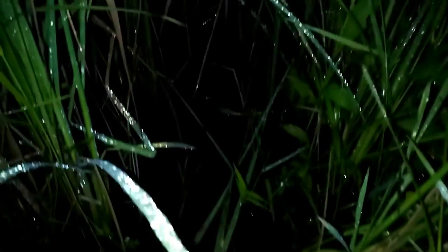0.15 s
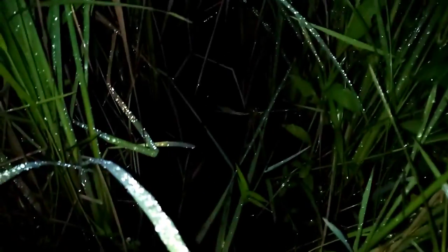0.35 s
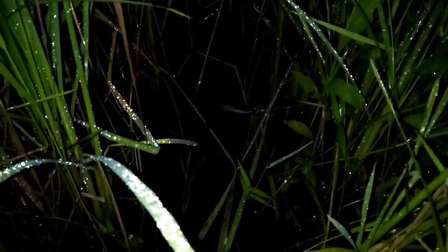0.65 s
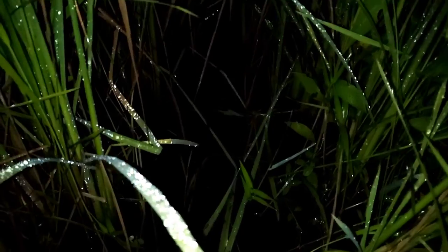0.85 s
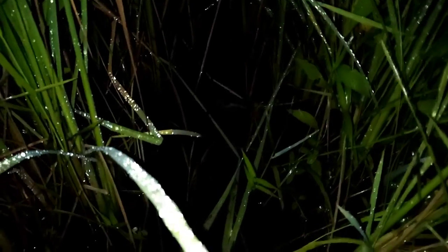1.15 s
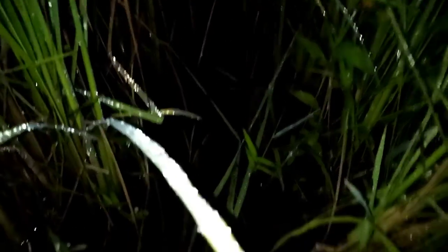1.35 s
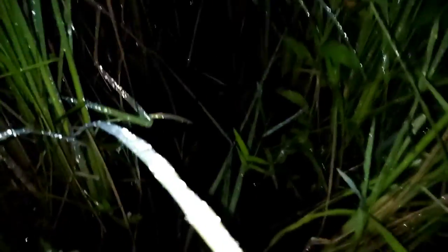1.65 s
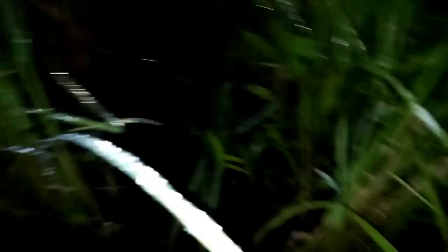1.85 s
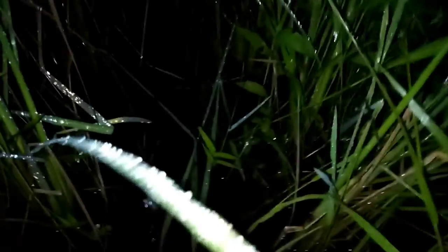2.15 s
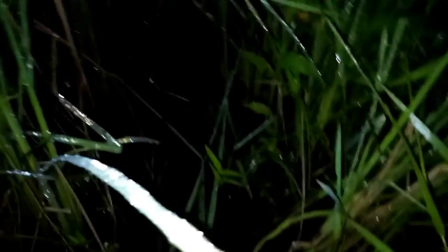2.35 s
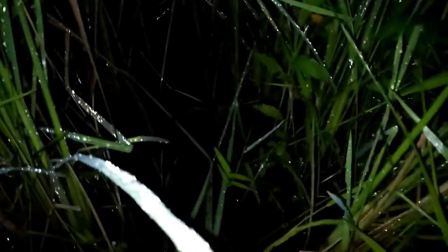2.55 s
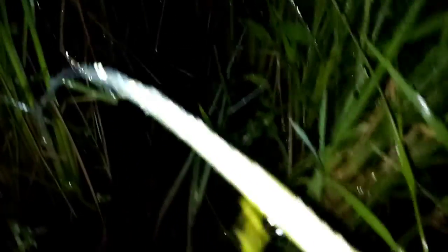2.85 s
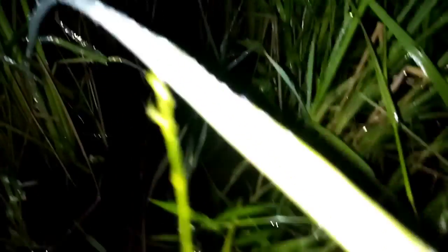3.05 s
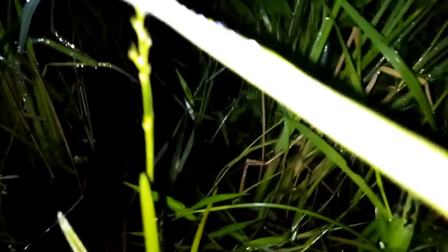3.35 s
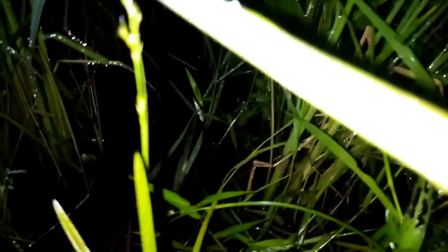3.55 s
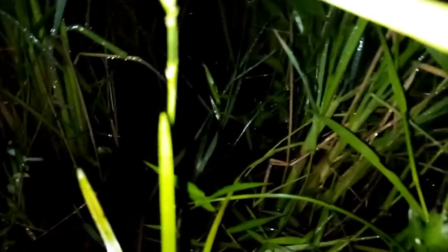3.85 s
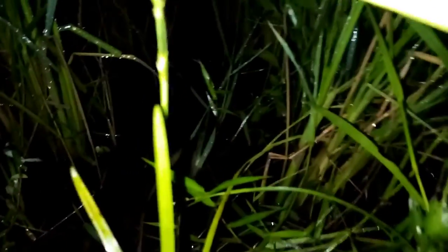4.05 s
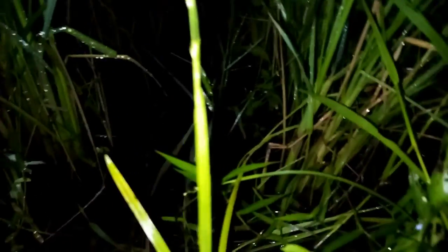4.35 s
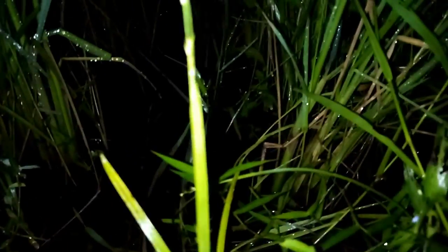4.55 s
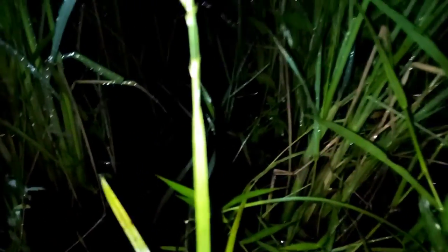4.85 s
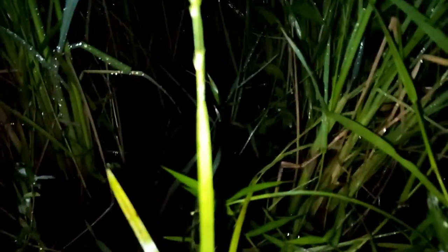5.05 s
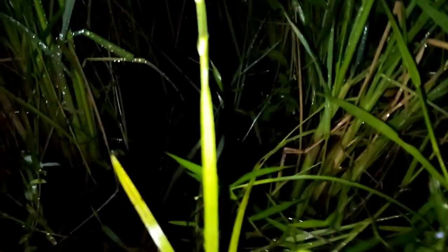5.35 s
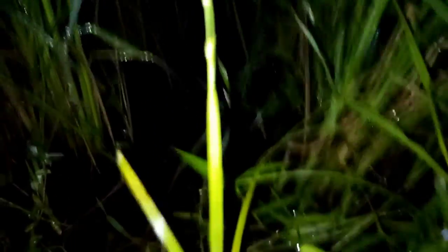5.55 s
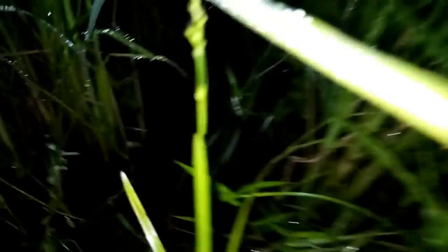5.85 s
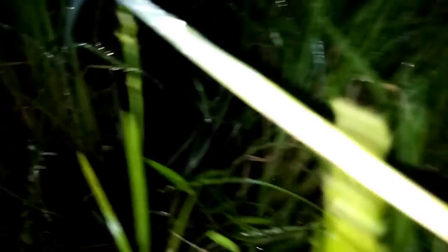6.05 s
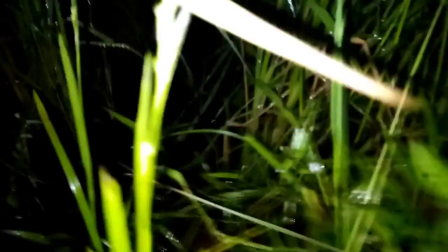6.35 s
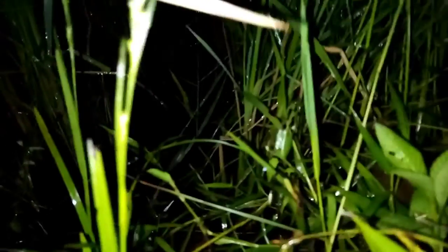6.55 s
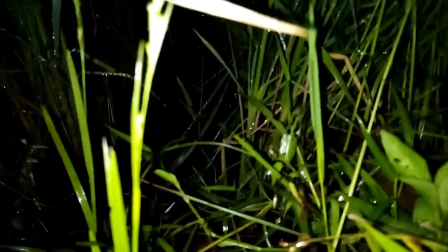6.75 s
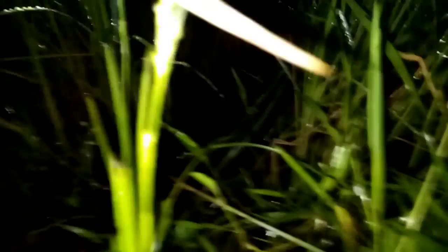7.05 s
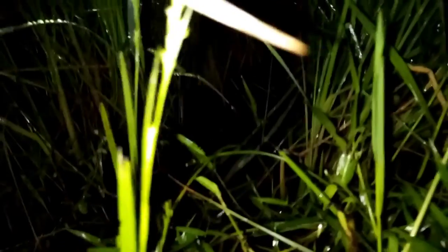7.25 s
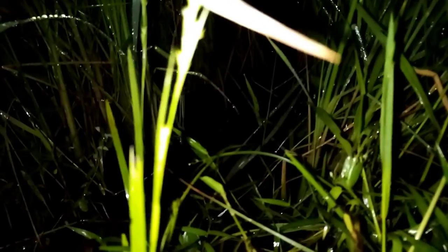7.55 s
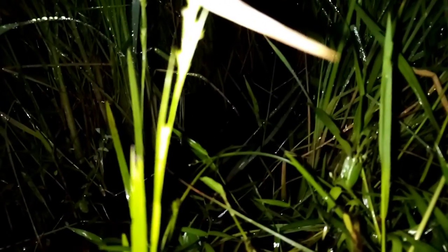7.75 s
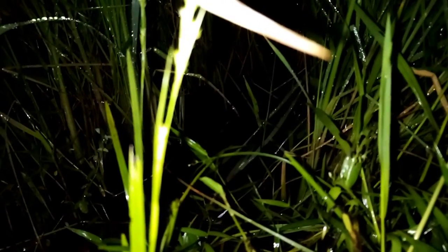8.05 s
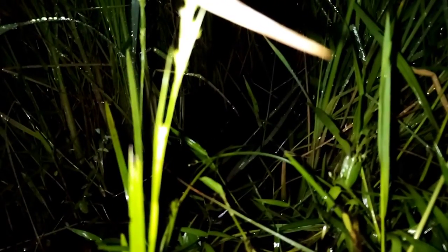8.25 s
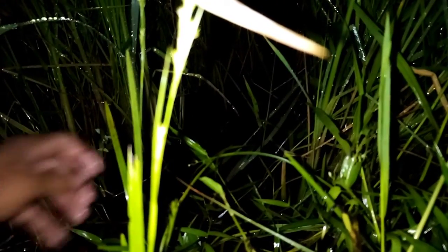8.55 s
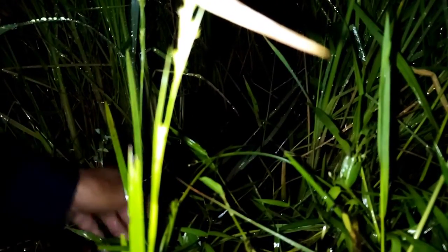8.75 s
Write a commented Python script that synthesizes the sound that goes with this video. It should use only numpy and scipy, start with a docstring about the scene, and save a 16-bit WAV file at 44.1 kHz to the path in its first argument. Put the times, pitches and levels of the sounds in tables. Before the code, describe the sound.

Crickets chirp steadily at night over distant frogs, with faint grass rustling, a brief splash, a few microphone knocks and nearer buzzing frog calls.

```python
"""Wet grass at the water's edge, at night. Close to the microphones a cricket scrapes its wings in nine
chirps a second; far off lies a chorus of crickets and frogs. A nearer frog gives three buzzing calls,
pulses ringing in its vocal sac. Blades rustle, drops tick on leaves, water splashes briefly, a hand
reaches into the grass and the hand-held camera is knocked. The right microphone is muffled,
so sound through the air is heard almost wholly on the left."""
import sys
import numpy as np
from scipy import signal
from scipy.fft import next_fast_len
from scipy.io import wavfile
from scipy.ndimage import map_coordinates

SR = 44100
rng = np.random.default_rng(int(sys.argv[2]) if len(sys.argv) > 2 else 0)


def master_out(mix):
    """Clip the mix to full scale and print it as 16-bit PCM to the path in sys.argv[1]."""
    frames = np.transpose(np.atleast_2d(mix))
    ceiling = np.clip(frames, -1, 1)
    pcm = np.round(ceiling * 32767).astype(np.int16)
    wavfile.write(sys.argv[1], SR, pcm)


N = 392049
TIME = np.arange(N) / SR


def near_cricket(wing_hz=6985, strokes_per_s=107, chirp_s=.066, sink_hz=190, gain_db=1):
    """Close by: each chirp is a swell of wing strokes; the tone sinks and scrapes through each stroke."""
    # chirps: (middle [s], level [dB])
    chirps = [(0.089, -43), (0.204, -47), (0.326, -41.5), (0.424, -42), (0.537, -43.5), (0.647, -41),
              (0.756, -40.5), (0.861, -38.5), (0.979, -38), (1.092, -37), (1.208, -40), (1.31, -38),
              (1.409, -40.5), (1.545, -38.5), (1.647, -35.5), (1.762, -36), (1.874, -37.5), (1.976, -36),
              (2.087, -37.5), (2.203, -36.5), (2.314, -38), (2.425, -36), (2.536, -35), (2.644, -34.5),
              (2.754, -35.5), (2.867, -38.5), (2.988, -40.5), (3.104, -37.5), (3.21, -37), (3.328, -39.5),
              (3.438, -40.5), (3.543, -40), (3.679, -41), (3.793, -41.5), (3.883, -42.5), (3.988, -40),
              (4.09, -40.5), (4.213, -44), (4.315, -42.5), (4.424, -41.5), (4.549, -40.5), (4.646, -43.5),
              (4.762, -41.3), (4.878, -46), (4.984, -43.5), (5.099, -42.5), (5.216, -43.5), (5.343, -41.5),
              (5.445, -42), (5.578, -41.5), (5.7, -41.5), (5.784, -39.5), (5.893, -43.5), (6.004, -41.5),
              (6.118, -37), (6.232, -46), (6.343, -40.5), (6.462, -42), (6.574, -42.5), (6.674, -41),
              (6.792, -40.5), (6.903, -37.5), (7.02, -39.5), (7.135, -37), (7.249, -39.5), (7.354, -39),
              (7.466, -36.5), (7.591, -39), (7.698, -40), (7.818, -41), (7.927, -40.5), (8.034, -41),
              (8.148, -40.5), (8.255, -41), (8.38, -40), (8.478, -40), (8.6, -40.5), (8.715, -39.5),
              (8.835, -46.5)]
    out, t = np.zeros(N), np.arange(int(chirp_s * SR)) / SR
    swell = signal.windows.tukey(len(t), .28)
    for at, db in chirps:
        pace = strokes_per_s * (1 + .04 * rng.standard_normal())
        strokes = t * pace + rng.random() + .04 * drift(len(t), 100)
        within = strokes % 1
        force = np.sin(np.pi * within) ** 1.4 * amp(1.6 * rng.standard_normal(32)[strokes.astype(int)])
        hz = wing_hz + sink_hz * (.5 - within) + 40 * drift(len(t), 150)
        scrape = .22 * drift(len(t), 450)
        tone = np.sin(phase(hz) + scrape)
        add(out, at - chirp_s / 2, amp(db + gain_db) * evened(force * tone * swell))
    # as the camera sways, the echoes from the stalks blend from one pattern into another
    sway = 2 * np.pi * .27 * TIME
    blends = abs(np.cos(sway)), abs(np.sin(sway))
    heard = sum(scattered(out * blend, t60=.055, wet_db=-8) * blend for blend in blends)
    return out.std() * evened(heard)


def near_frog(bank_echo_s=.21):
    """Nearer than the chorus: two bright calls and a deeper one, each thrown back by the far bank."""
    # bright calls: (start [s], length [s], level [dB], pulse rate [Hz], scoop [share], scoop time [s],
    # droop [share], roughness [ratio], lift of the sac's lower ring [dB], bank echo [dB])
    bright_calls = [(-.055, .455, -41.5, 148.8, .06, .155, .012, .42, 7, -14),
                    (6.345, .41, -40, 147.8, .05, .11, .03, .26, 0, -17)]
    # the deeper call, same columns
    deep_calls = [(6.845, .47, -44, 126.8, -.03, .19, .003, .22, 0, -26)]
    # resonances of the vocal sac in each kind of call: (frequency [Hz], level [dB])
    bright_sac = [(1700, -45), (2200, -19), (2350, -11), (2500, -12), (2660, -10), (2810, -13), (2950, -5),
                  (3090, 1), (3250, -1), (3400, -17), (4100, -40), (5000, -17), (5200, -20), (5470, -16),
                  (5900, -26), (9000, -75)]
    deep_sac = [(1700, -42), (1920, -27), (2030, -11), (2160, 0), (2290, -8), (2410, -13), (2550, -14),
                (2670, -20), (2900, -40), (3900, -40), (4060, -20), (4190, -14), (4450, -24), (4800, -45),
                (9000, -96)]
    out = np.zeros(N)
    for calls, sac in (bright_calls, bright_sac), (deep_calls, deep_sac):
        for start, *shape, echo_db in calls:
            call = frog_call(*shape, sac)
            add(out, start, call)
            add(out, start + bank_echo_s, amp(echo_db) * call)
    return scattered(scattered(out, t60=.039, wet_db=-13), t60=.45, wet_db=-8)


def frog_call(length, db, pulse_hz, scoop, scoop_s, droop, rough, lift_db, sac):
    """Uneven pulses buzz through the vocal sac; they glide onto their rate and sag as the air runs out."""
    rise_s, release_s, ring_hz, ring_width_hz = .096, .011, 2480, 190
    t = np.arange(0, length, 1 / SR)
    hz = pulse_hz * (1 - scoop * np.exp(-(t / scoop_s) ** 4) - droop * (t / length) ** 6)
    hoarse = rough * (1 + 6.6 * (2 * t / length - 1) ** 2)  # roughest at both ends
    turns = np.cumsum(hz * (1 + .0033 * drift(len(t), 127.6))) / SR
    # the way through the reeds smears the pulses and lets each overtone swell on its own
    overtones = (amp(1.8 * drift(len(t), 14)) * np.cos(2 * np.pi * k * turns + .8 * drift(len(t), 7))
                 for k in range(10, 48))
    pulses = evened(sum(overtones))
    puffs = evened(np.exp(-(turns % 1) / 3.2) * rng.standard_normal(len(t)))
    throat = [(f, level + lift_db * np.exp(-((f - ring_hz) / ring_width_hz) ** 2)) for f, level in sac]
    drive = (pulses + hoarse * puffs) / np.sqrt(1 + (hoarse / 2) ** 2)
    buzz = evened(coloured(drive * amp(1.1 * drift(len(t), 90)), throat))
    return amp(db) * buzz * np.minimum(t / rise_s, 1) * np.minimum((length - t) / release_s, 1)


def camera_knocks(rattle_s=.0033, right_db=-1, right_lag_s=.00081):
    """At the microphones: a rattling click through the air, and a thud of the casing that reaches both."""
    # knocks: (time [s], thud level [dB], click level [dB], thud's low cut [Hz])
    knocks = [(.835, -50, -60, 100), (1.336, -37, -61, 200), (4.358, -28, -23, 390),
              (4.43, -36, -28.5, 280), (5.5575, -19, -19, 111), (5.58, -29.5, -35, 149),
              (6.263, -33.5, -35, 170), (6.279, -50, -46, 170)]
    # modes of the casing: (frequency [Hz], level [dB], time to fall 60 dB [s])
    modes = [(212, -7.5, 0.11), (327, -7, 0.04), (433, -3, 0.05), (468, 2.5, 0.095)]
    # spectrum of the click: (frequency [Hz], level [dB])
    click_colour = [(40, -43), (200, -4.5), (500, 5), (800, -27), (1400, -6), (1750, -0.5), (2300, -17.5),
                    (3200, -18.5), (4300, -17.5), (6000, -23.5), (9000, -39.5), (15000, -74.5)]
    thud, click, t = np.zeros(N), np.zeros(N), np.arange(SR // 6) / SR
    ring = sum(amp(db - 60 * t / t60) * np.sin(2 * np.pi * hz * t) for hz, db, t60 in modes) / 3
    for at, thud_db, click_db, low_hz in knocks:
        burst = coloured(rng.standard_normal(len(t)) * np.exp(-t / rattle_s), click_colour)
        low_cut = signal.butter(3, low_hz, "high", fs=SR, output="sos")
        add(thud, at, amp(thud_db) * signal.sosfilt(low_cut, ring))
        add(click, at, amp(click_db) * burst / abs(burst).max())
    right_thud = amp(right_db) * np.roll(thud, round(right_lag_s * SR))
    return scattered(click, t60=.14, wet_db=-7.5), np.array([thud, right_thud])


def water(splash_db=7, rise_s=.014, fall_s=.015, plop_db=2, bubbles=14, bubble_t60=.018):
    """Quick sloshes of spray, and clusters of small bubbles that rise in pitch as they ring."""
    # sloshes: (peak time [s], level [dB])
    sloshes = [(3.95, -60), (4.048, -53), (4.14, -50), (4.164, -39), (4.228, -48), (4.285, -49),
               (4.335, -46.5), (4.435, -56), (4.515, -61)]
    # stirred water swelling beneath them: (middle [s], level [dB], length [s])
    surge = [(4.19, -62.5, 0.76)]
    # spray with the hollow ring of the water: (frequency [Hz], level [dB])
    splash_colour = [(50, -80), (300, -42.5), (650, -31), (980, 9), (1230, -13), (1480, -2), (1650, 3.5),
                     (1820, 1.5), (2300, -9.5), (3200, -12.5), (4500, -22.5), (8000, -60)]
    # plops: (start [s], level [dB], bubble pitch [Hz], length [s])
    plops = [(4.141, -31, 1580, 0.028), (4.159, -33, 1440, 0.0075), (4.162, -26, 1044, 0.015),
             (4.223, -36.5, 1004, .015), (5.724, -49, 1560, 0.0075), (6.229, -37, 1090, 0.0087),
             (6.242, -42, 1410, .025), (6.444, -45.5, 1660, .015), (6.857, -42, 1770, 0.07),
             (6.927, -42, 1800, 0.071), (7.023, -43.5, 1800, 0.072)]
    slosh = sum(amp(db) * np.exp(-np.maximum((at - TIME) / rise_s, (TIME - at) / fall_s).clip(0, 20))
                for at, db in sloshes)
    spray = evened(coloured(grains(N, per_s=2500, spread_db=2), splash_colour))
    out = (slosh + swells(surge)) * amp(splash_db + 2 * drift(N, 60)) * spray
    t = np.arange(SR // 25) / SR
    decay = amp(-60 * t / bubble_t60)
    for at, db, hz, length in plops:
        soft_start = 1 - np.exp(-t * hz)  # a bubble takes about a cycle to get going
        for k, (detune, force) in enumerate(rng.standard_normal((bubbles, 2))):
            bubble = np.sin(2 * np.pi * hz * np.exp(.029 * detune) * t * (1 + t)) * decay * soft_start
            start = at + length * (k + rng.random()) / bubbles
            add(out, start, amp(db + plop_db + 2 * force) * bubble)
    return scattered(out, t60=.063, wet_db=-3.5)


def grass(stalks_db=10, brush_db=3):
    """Stalks crackle softly throughout; now and then a wet blade brushes past, catching and slipping."""
    # stalks stirring and blades brushing: (middle [s], level [dB], length [s])
    stirs = [(.3, -78, 0.23), (1.3, -78.5, 0.66), (1.76, -70, 0.22), (2.2, -74.5, 0.52), (3.0, -78, .7),
             (4.25, -61, 0.39), (5.7, -75, 0.21), (6.9, -74, 0.19), (8.58, -67.5, 0.39)]
    brushes = [(.01, -42, 0.04), (.12, -51.5, 0.17), (0.803, -52.5, 0.057), (0.921, -52, 0.019),
               (1.21, -52.5, 0.11), (1.287, -52, 0.041), (1.685, -52, 0.057), (1.775, -51, 0.17),
               (2.067, -50.5, 0.16), (2.265, -51, 0.068), (2.745, -52.5, 0.033), (3.76, -46.5, 0.052),
               (4.036, -46.5, 0.013), (6.254, -47, 0.053), (6.912, -48.5, 0.3), (7.147, -53.5, 0.12),
               (8.365, -51, 0.21), (8.649, -54, 0.4)]
    # their spectra: (frequency [Hz], level [dB])
    stalk_colour = [(150, -10), (400, 18.5), (850, 24), (1500, 28), (2800, 12.5), (4000, -7), (5000, 13),
                    (7500, 24), (9000, -53), (12000, -90.5)]
    blade_colour = [(500, -19.5), (1500, -5.5), (3000, 0), (4800, -1.5), (7000, 10.5), (8200, -4),
                    (9300, -17), (12000, -57), (15500, -26.5)]
    stirring = amp(stalks_db) * (amp(-81) + swells(stirs))
    stalks = stirring * evened(coloured(grains(N, per_s=2000, spread_db=3), stalk_colour))
    catching = amp(3 * drift(N, 140))
    blades = swells(brushes) * evened(catching * coloured(grains(N, per_s=3000, spread_db=3), blade_colour))
    return scattered(stalks + amp(brush_db) * blades, t60=.029, wet_db=5.5)


def snapping_blades(attack_s=.004):
    """A crisp crackle starts sharply and dies away as a blade lets go."""
    # snaps: (time [s], level [dB], decay [s])
    snaps = [(.805, -52, 0.011), (0.92, -51, 0.0084), (1.282, -50, 0.0071), (1.665, -43, 0.018),
             (1.731, -53, 0.015), (1.799, -44, 0.014), (1.819, -44.5, 0.0085), (3.747, -50, 0.011),
             (8.362, -62, 0.0047), (8.634, -69, 0.0053)]
    # their spectrum: (frequency [Hz], level [dB])
    snap_colour = [(300, -27), (2500, -6), (4500, -5), (8000, -9), (12500, -21.5), (15000, -19)]
    out, t = np.zeros(N), np.arange(SR // 8) / SR
    for at, db, decay_s in snaps:
        crackle = evened(coloured(grains(len(t), per_s=6000, spread_db=1), snap_colour))
        add(out, at, amp(db) * crackle * np.minimum(t / attack_s, 1) * np.exp(-t / decay_s))
    return out


def reaching_hand(catch_db=2):
    """A hand and sleeve push into the grass: soft buffets of cloth under a clumpy crackle of stalks."""
    # reaches: (middle [s], level [dB], length [s])
    reaches = [(8.34, -52, 0.033), (8.62, -52, 0.24)]
    # spectrum of cloth and stalks: (frequency [Hz], level [dB])
    hand_colour = [(40, -14), (120, 11), (300, 14.5), (550, -18), (950, 12.5), (1800, 0), (5500, 9.5),
                   (9000, -28), (12000, -45)]
    crackle = coloured(grains(N, per_s=1400, spread_db=3), hand_colour)
    return swells(reaches) * evened(crackle * amp(catch_db * drift(N, 41)))


def drips(t60=.028, half_width_hz=1100):
    """Each drop gives a leaf a short, noisy, high ring."""
    # drops landing: (time [s], level [dB], pitch [Hz])
    drops = [(3.747, -36, 5630), (4.7655, -32, 5230), (5.46, -48, 4550), (5.618, -38, 3380),
             (8.219, -32, 4240), (8.22, -37, 2125)]
    out, t = np.zeros(N), np.arange(SR // 20) / SR
    onset = 1 - np.exp(-t * half_width_hz)
    for at, db, hz in drops:
        tick = drift(len(t), 2 * half_width_hz) * np.sin(2 * np.pi * hz * t)
        add(out, at, amp(db - 60 * t / t60) * onset * tick)
    return out


def trilling_cricket(wing_hz=6480, strokes_per_s=90, wander_hz=130):
    """Now and then a lower-pitched cricket rises out of the chorus with one short trill of its wings."""
    # trills: (middle [s], level [dB], length [s])
    trills = [(4.22, -47, 0.11), (4.72, -43.5, 0.15), (6.02, -39.5, 0.048), (6.88, -46, 0.1),
              (7.76, -44.5, 0.25)]
    tone = np.sin(phase(wing_hz + wander_hz * drift(N, 300)))
    strokes = 1 + np.sin(2 * np.pi * strokes_per_s * TIME + drift(N, 14))
    return swells(trills) * evened(scattered(strokes * tone, t60=.085, wet_db=-8.5))


def far_crickets(count=16, level_db=-42, waver_db=2):
    """Many crickets, each on its own pitch and rhythm, blurred by distance."""
    # spectrum of the chorus: (frequency [Hz], level [dB])
    chorus_colour = [(5000, -54.5), (5800, -17), (6150, -2.5), (6450, -3), (6750, 4), (7000, 4),
                     (7400, -9.5), (8050, -23.5), (9100, -59.5), (12000, -74.5)]
    out = np.zeros(N)
    for hz in np.linspace(6120, 6820, count):
        chirps_per_s, strokes_per_s, offset = rng.uniform(5, 11), rng.uniform(65, 125), rng.random()
        chirping = 1 + np.sin(2 * np.pi * (chirps_per_s * TIME + offset + .24 * drift(N, 2)))
        strokes = 2 * np.pi * strokes_per_s * TIME + drift(N, 23)
        tone = np.sin(phase(hz + 35 * drift(N, 60)) + np.cos(strokes))
        out += chirping * (1 + np.sin(strokes)) * tone
    blur = evened(scattered(out, t60=.64, wet_db=-3.5))
    blur += amp(10) * rng.standard_normal(N)  # the farthest merge into a hiss
    return amp(level_db + waver_db * drift(N, 2.7)) * evened(coloured(blur, chorus_colour))


def far_frogs(edge_s=.16, low_db=-1.5, high_db=1.5):
    """Far across the water: low-voiced frogs call in bouts, high-voiced ones without a pause."""
    # bouts of the low voices: (start [s], end [s], level [dB])
    bouts = [(-.3, 3.5, -60.5), (3.7, 5.75, -70.5), (5.74, 6.1, -58.5), (6.25, 7.75, -62.5),
             (8.2, 8.9, -59.5)]
    # the high voices wander together: (time [s], pitch [Hz])
    high_pitch = [(.6, 3463), (1.05, 3380), (1.5, 3438), (3.2, 3404), (3.8, 3446), (4.55, 3297),
                  (5.4, 3470), (6.3, 3360), (7.4, 3500), (8.1, 3301), (8.8, 3450)]
    # and ease off now and then: (time [s], level [dB])
    high_level = [(0, -62), (.6, -64), (.78, -58.5), (2.9, -59.5), (3.3, -57.5), (4.05, -57.5), (4.55, -65),
                  (4.85, -58.5), (5.1, -60), (5.55, -55), (5.85, -60), (6.9, -59), (7.2, -61), (7.7, -56.5),
                  (8.15, -60), (8.8, -56)]
    calling = sum(amp(db) * np.clip(np.minimum(TIME - start, end - TIME) / edge_s + .5, 0, 1)
                  for start, end, db in bouts)
    low = frog_choir(sac_hz=2168, width_hz=170, pulse_hz=60)
    low = amp(low_db) * evened(patchy(low, depth_db=3, patch_hz=90, patch_s=.1))
    hz = curve(high_pitch)
    high = frog_choir(sac_hz=hz.mean(), width_hz=350, pulse_hz=105)
    high = patchy(high, depth_db=2.5, patch_hz=120, patch_s=.05)
    wandering = (signal.hilbert(high, next_fast_len(N))[:N] * np.exp(1j * phase(hz - hz.mean()))).real
    return (amp(-73) + calling) * low + amp(high_db + curve(high_level)) * evened(wandering)


def frog_choir(sac_hz, width_hz, pulse_hz, count=4):
    """A few distant frogs: overlapping pulse trains ringing in their vocal sacs."""
    pulses = np.zeros(N)
    for _ in range(count):
        turns = np.cumsum(pulse_hz * (rng.uniform(.75, 1.25) + .07 * drift(N, 25))) / SR
        pulses += np.diff(np.floor(turns), prepend=0) * amp(2.5 * drift(N, 60))
    sac = signal.butter(3, [sac_hz - width_hz / 2, sac_hz + width_hz / 2], "band", fs=SR, output="sos")
    return evened(scattered(signal.sosfilt(sac, pulses), t60=.47, wet_db=-2.5))


def far_insects(band_hz=(4575, 5325), gain_db=-1):
    """Distant insects merge into one thin, finely grained band beneath the crickets."""
    # their rise and fall: (time [s], level [dB])
    level = [(0, -61.5), (1.4, -60), (3.1, -60.5), (3.6, -64), (5.3, -66.5), (6.1, -63.5), (6.4, -57.5),
             (7.2, -64.5), (7.9, -60.5), (8.8, -59.5)]
    band = signal.butter(2, band_hz, "band", fs=SR, output="sos")
    shrill = signal.sosfilt(band, grains(N, per_s=1500, spread_db=1))
    return amp(gain_db + curve(level)) * evened(patchy(shrill, depth_db=2.5, patch_hz=150, patch_s=.06))


def far_wash(half_width_hz=330, gain_db=1.5):
    """From far off, a soft band of noise comes and goes in patches."""
    # course of the wash: (time [s], level [dB], centre [Hz])
    course = [(0, -65.5, 564.2), (2.1, -61.5, 512.6), (2.6, -68, 602.3), (3.3, -66, 699.3), (4.9, -70, 863),
              (6.198, -59.5, 854.5), (7.2, -58.5, 854.5), (7.9, -71.5, 799), (8.6, -59.5, 655)]
    # its colour: (frequency [Hz], level [dB])
    wash_colour = [(250, -5.5), (470, 0.5), (600, -9), (740, 4), (1000, -1), (1400, -13)]
    times, db, hz = np.transpose(course)
    lowpass = signal.butter(3, half_width_hz, fs=SR, output="sos")
    band = signal.sosfilt(lowpass, rng.standard_normal(N) + 1j * rng.standard_normal(N))
    noise = (band * np.exp(1j * phase(np.interp(TIME, times, hz)))).real
    wash = patchy(coloured(noise, wash_colour), depth_db=9.5, patch_hz=95, patch_s=.075)
    return amp(np.interp(TIME, times, db) + gain_db) * evened(wash)


def night_air(shared=.36, rumble_top_hz=300, swell_db=7):
    """A lumpy far rumble, partly common to both microphones, under a faint shifting hiss."""
    # still air at each microphone: (frequency [Hz], level [dB])
    left_colour = [(20, -105), (45, -95.5), (75, -82.5), (120, -77.5), (175, -80.5), (250, -93), (500, -95),
                   (1400, -101), (4000, -101), (5700, -101), (8000, -113), (9000, -123), (13000, -132),
                   (15000, -119)]
    right_colour = [(20, -104), (45, -104), (110, -84.5), (250, -103), (480, -106), (800, -107),
                    (1300, -113), (6500, -115), (8500, -134), (13000, -134), (15000, -121)]
    left_noise, right_noise = rng.standard_normal((2, N)) * np.sqrt(SR / 2)
    low = signal.sosfiltfilt(signal.butter(4, rumble_top_hz, fs=SR, output="sos"), left_noise)
    swell = evened(amp(swell_db * np.tanh(drift(N, 14))))
    rumble = swell * patchy(low, depth_db=2, patch_hz=130, patch_s=.07)
    hiss = patchy(left_noise - low, depth_db=6, patch_hz=251, patch_s=.092)
    right = shared * rumble + np.sqrt(1 - shared ** 2) * right_noise
    return np.array([coloured(hiss + rumble, left_colour), coloured(right, right_colour)])


def scattered(x, t60, wet_db):
    """Direct sound plus the many weak echoes from stalks and banks."""
    t = np.arange(SR // 2) / SR
    tail = rng.standard_normal(len(t)) * amp(-60 * t / t60)
    wet = signal.oaconvolve(x, tail / np.linalg.norm(tail))[:len(x)]
    return (x + amp(wet_db) * wet) / np.sqrt(1 + amp(wet_db) ** 2)


def coloured(x, points, size=4096):
    """Causal filter through (frequency [Hz], level [dB]) points: it rings after a click, never before."""
    hz, db = np.transpose(points)
    bins_hz = abs(np.fft.fftfreq(size, 1 / SR))
    log_gain = np.log(amp(np.interp(np.log(bins_hz + 1), np.log(hz + 1), db)))
    taps = np.fft.ifft(np.exp(np.conj(signal.hilbert(log_gain)))).real[:size // 2]
    return signal.oaconvolve(x, taps)[:len(x)]


def patchy(x, depth_db, patch_hz, patch_s):
    """Lets neighbouring pitches swell and fade on their own, in short patches."""
    hz, times, spectra = signal.stft(x, SR, nperseg=2048, noverlap=1536)
    grid = np.meshgrid(hz / patch_hz, times / patch_s, indexing="ij")
    field = map_coordinates(rng.standard_normal((400, 400)), grid, order=1, mode="wrap")
    return signal.istft(spectra * evened(amp(depth_db * field)), nperseg=2048, noverlap=1536)[1][:len(x)]


def grains(count, per_s, spread_db):
    """Random clicks, most small and a few large."""
    clicks = (rng.random(count) < per_s / SR) * rng.standard_normal(count)
    return evened(clicks * amp(spread_db * np.minimum(rng.exponential(1, count), 4)))


def drift(count, per_s):
    """A random wander of about unit size."""
    knots = rng.standard_normal(4096)
    return np.interp(np.arange(count) * per_s / SR, np.arange(len(knots)), knots)


def swells(rows):
    """A gain that rises and falls smoothly around each (middle [s], level [dB], length [s])."""
    return sum(amp(db) * np.exp(-(2 * (TIME - at) / length) ** 2) for at, db, length in rows)


def curve(points):
    """Joins (time [s], value) points by straight lines."""
    return np.interp(TIME, *np.transpose(points))


def phase(hz):
    """Running phase of a changing pitch, in radians."""
    return 2 * np.pi * np.cumsum(hz) / SR


def add(mix, at, sound):
    """Adds a sound to the mix, starting at a time in seconds."""
    start = round(at * SR)
    sound = sound[max(-start, 0):]
    part = mix[max(start, 0):][:len(sound)]
    part += sound[:len(part)]


def amp(db):
    """Decibels to gain."""
    return 10 ** (np.asarray(db) / 20)


def evened(x):
    """Scales to rms 1."""
    return x / np.sqrt(np.mean(x ** 2) + 1e-20)


def scene(casing_db=-17, lag_samples=64):
    """Airborne sound reaches the left microphone freely, the right one muffled and late."""
    # muffling of the right microphone: (frequency [Hz], gain [dB])
    muffling = [(100, -11), (500, -13.5), (1000, -28), (2200, -30.5), (3100, -32), (5000, -35.5),
                (6400, -51), (7000, -39.5), (9000, -40)]
    clicks, thuds = camera_knocks()
    animals = near_cricket() + far_crickets() + trilling_cricket() + far_insects()
    animals += far_frogs() + near_frog()
    left = animals + far_wash() + grass() + reaching_hand() + snapping_blades() + drips() + water() + clicks
    late = np.pad(left, (lag_samples, 0))[:N]
    right = coloured(late, muffling) + amp(casing_db) * clicks  # clicks also come through the casing
    return np.array([left, right]) + thuds + night_air()


def record(dry):
    """The recorder passes nothing much above 15.5 kHz."""
    lowpass = signal.firwin(511, 15500, window=("kaiser", 9), fs=SR)
    return signal.oaconvolve(dry, lowpass[None], "same")


dry = scene()
out = record(dry)
master_out(out)
```